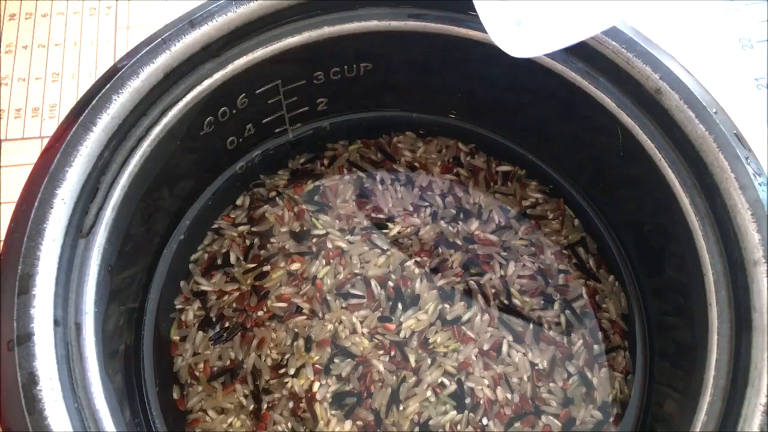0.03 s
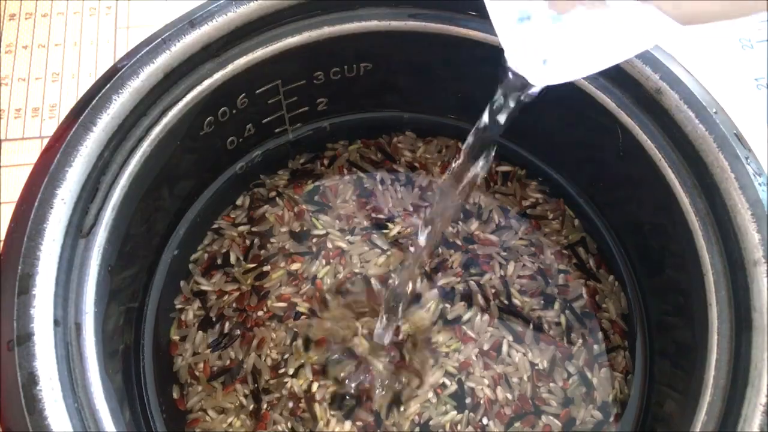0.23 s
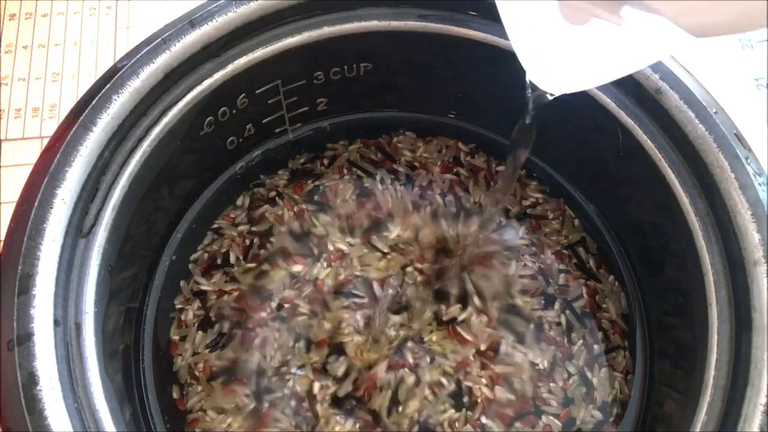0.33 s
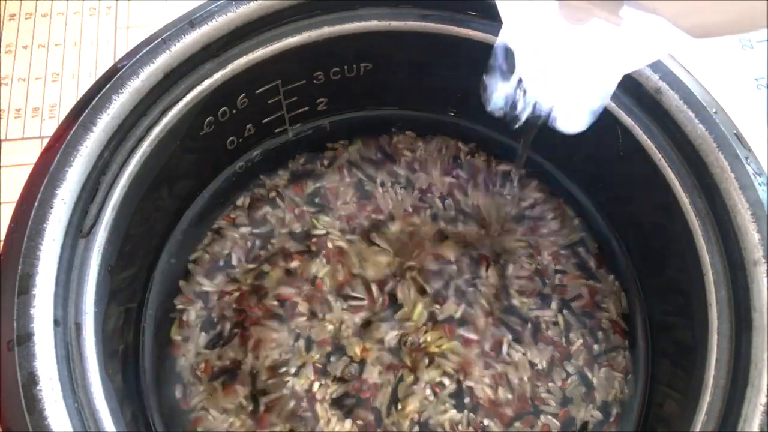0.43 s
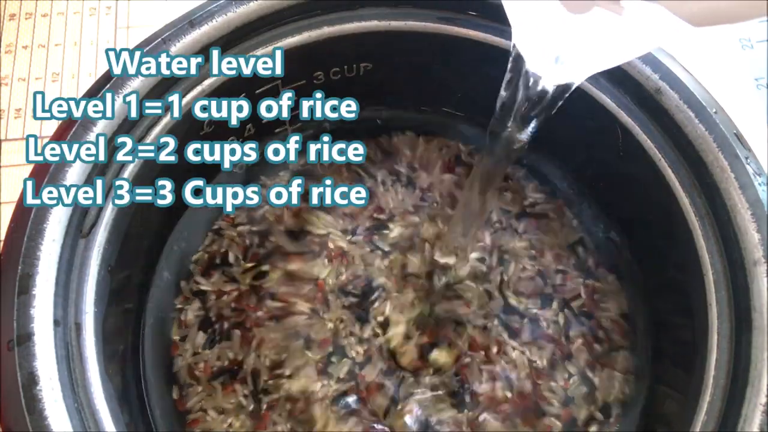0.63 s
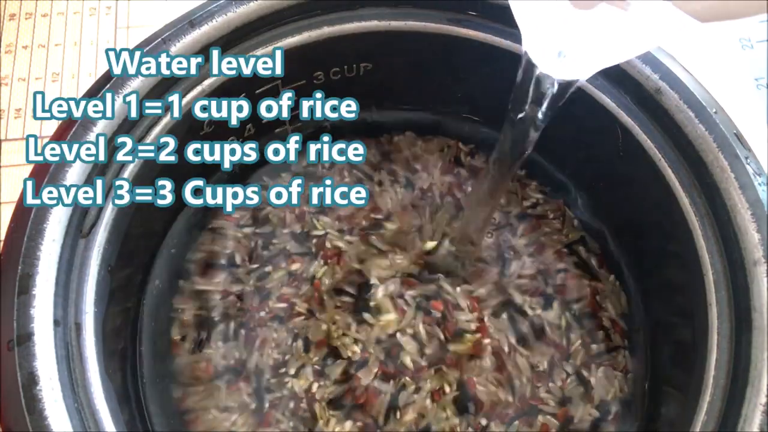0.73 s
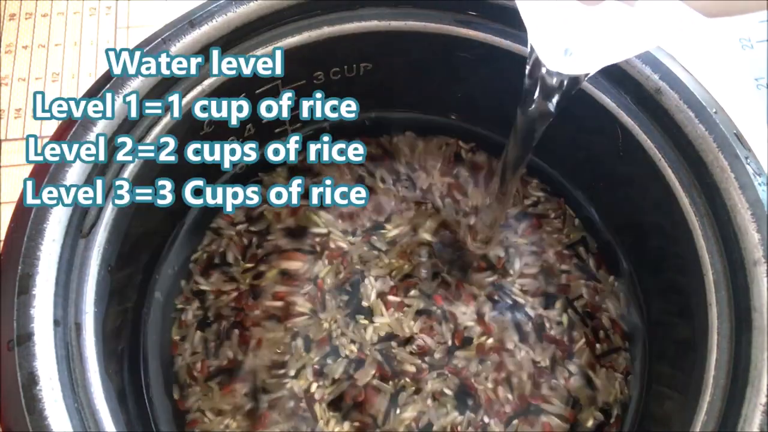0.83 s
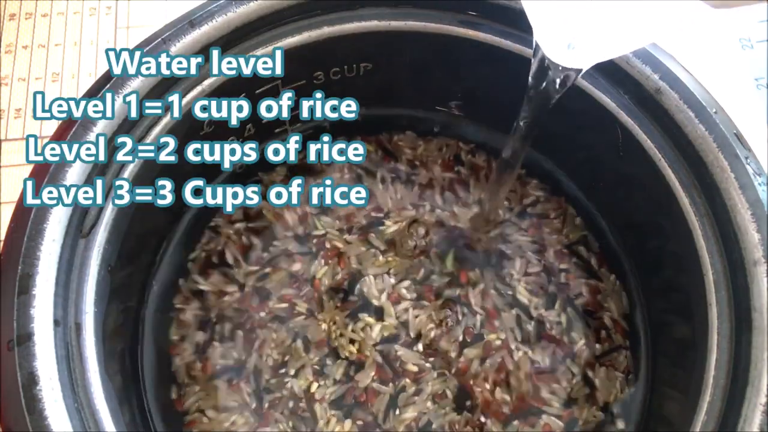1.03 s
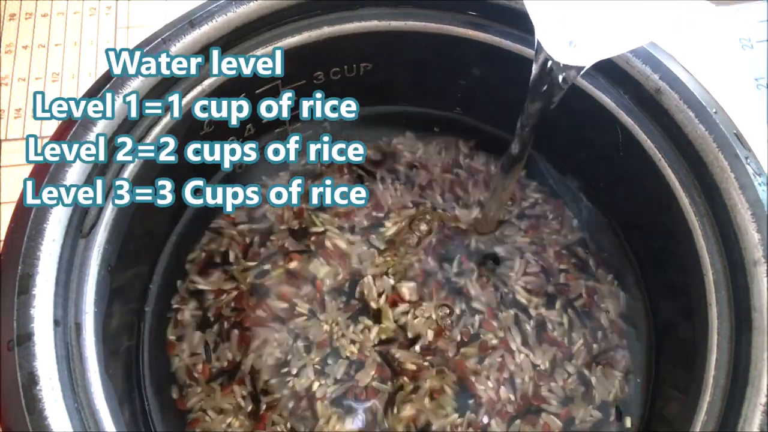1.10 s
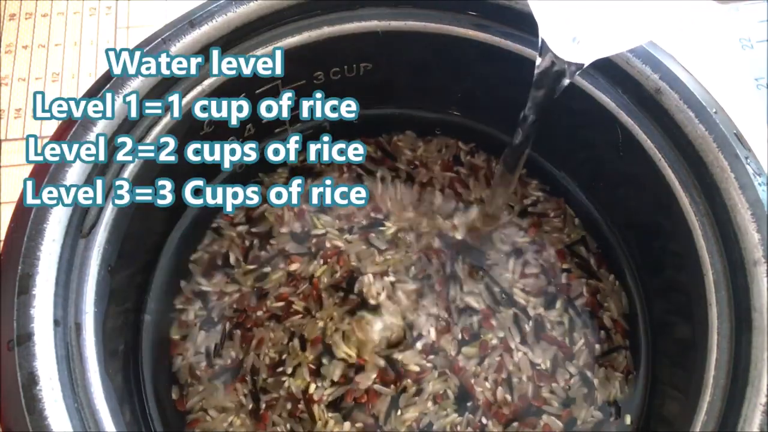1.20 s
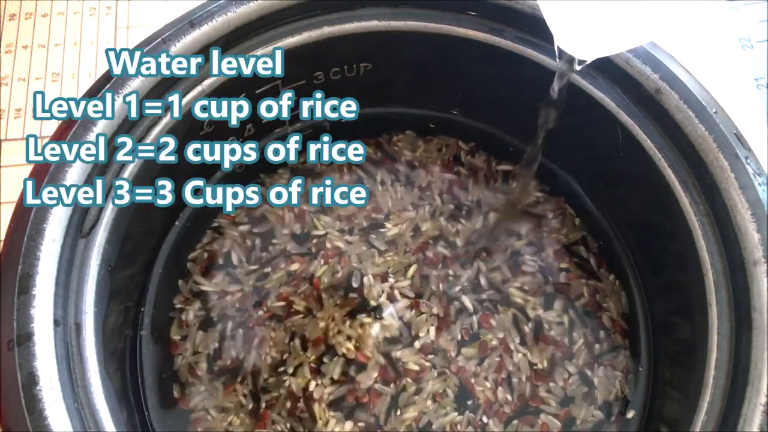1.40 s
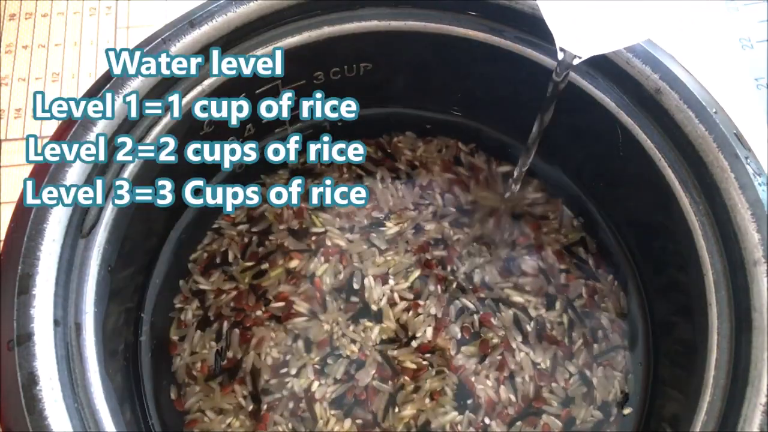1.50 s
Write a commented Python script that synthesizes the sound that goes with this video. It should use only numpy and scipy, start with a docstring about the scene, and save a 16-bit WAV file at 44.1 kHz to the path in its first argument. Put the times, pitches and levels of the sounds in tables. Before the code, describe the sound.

Close up in a quiet, humming kitchen, water splatters onto rice grains in a cooker pot. The plastic container knocks softly, then clacks once, and the stream soaks in with a fizzy crackle that dwindles to light drips.

```python
"""In a quiet kitchen with a low hum, water is poured from a plastic container onto rice in a metal
cooker pot. The container knocks softly, its modes ringing briefly; the first drops tick on the grains
and trap small air bubbles, which resonate. After one sharp clack the stream soaks in with a fine
crackle that thins out as the flow drops. The pot adds short echoes to the sound of the water."""
import sys
import numpy as np
from scipy import signal
from scipy.fft import rfft, irfft, next_fast_len
from scipy.io import wavfile

SR = 44100
rng = np.random.default_rng(int(sys.argv[2]) if len(sys.argv) > 2 else 0)


def materialize(psi):
    """Save the field psi as 16-bit PCM at rate SR to the path in sys.argv[1].

    A 1-D psi becomes a single channel; in a 2-D psi each row is a channel.
    """
    bounded = np.clip(np.atleast_2d(psi).T, -1, 1)
    quanta = np.round(bounded * 32767).astype(np.int16)
    wavfile.write(sys.argv[1], SR, quanta)


N = 68355

GUSH_S = (0.35, 0.49, 0.61)   # the full stream lands: start, peak, end


def from_db(db):
    """Amplitude ratio of a level: a factor of ten per 20 dB."""
    return 10 ** (np.asarray(db) / 20)


def rms_one(x):
    """Normalisation to unit mean power."""
    return x / np.sqrt(np.mean(x ** 2) + 1e-20)


def level_at(spectrum, hz):
    """Interpolation of a spectrum's level on a logarithmic frequency axis."""
    f, db = np.transpose(spectrum)
    return np.interp(np.log(hz + 1), np.log(f), db)


def noise(spectrum):
    """Spectral shaping of white noise, rms 1."""
    size = next_fast_len(N)
    gain = from_db(level_at(spectrum, np.fft.rfftfreq(size, 1 / SR)))
    return rms_one(irfft(rfft(rng.standard_normal(size)) * gain, size)[:N])


def decay(t, t60):
    """Exponential damping by 60 dB in t60."""
    return np.exp(-np.log(1000) * t / t60)


def onset(t, attack_s):
    """Exponential approach to full amplitude."""
    return 1 - np.exp(-t / attack_s)


def swell(times, peak_db):
    """Triangular amplitude envelope through start, peak and end times."""
    return from_db(peak_db) * np.interp(np.arange(N) / SR, times, [0, 1, 0])


def add(out, start_s, sound):
    """Superposition of a delayed sound."""
    i = max(int(start_s * SR), 0)
    out[i:i + len(sound)] += sound[:N - i]


def wavering(hz, depth=0.69, bandwidth_hz=10):
    """Slow random modulation of a tone's amplitude and phase, rms 1."""
    lowpass = signal.butter(2, bandwidth_hz, fs=SR, output="sos")
    slow = signal.sosfilt(lowpass, rng.standard_normal((2, 2 * N)))[:, N:]
    in_phase, quadrature = depth * rms_one(slow)
    phase = 2 * np.pi * hz * np.arange(N) / SR
    return rms_one((1 + in_phase) * np.sin(phase) + quadrature * np.cos(phase))


def bursts(flow, spectrum, pitches, peak_per_s, cycles, spread_db):
    """Shot noise: random impulses ring resonators, more rarely in weak flow; the rms follows the flow."""
    activity = np.maximum(flow / flow.max(), .02) ** 1.1
    sizes = from_db(spread_db * np.minimum(rng.exponential(1, N), 3)) * rng.choice([-1, 1], N)
    occurs = rng.random(N) < activity * peak_per_s / SR
    impulses = sizes * flow / np.sqrt(activity) * occurs
    pitch_index = rng.integers(0, len(pitches), N)
    out = np.zeros(N)
    for k, hz in enumerate(pitches):
        radius, angle = decay(1 / SR, cycles / hz), 2 * np.pi * hz / SR
        resonator = [1, 0, -1, 1, -2 * radius * np.cos(angle), radius * radius]
        ringing = signal.sosfilt([resonator] * 2, impulses * (pitch_index == k) + 1e-18)
        out += from_db(level_at(spectrum, hz)) * (1 - radius) * ringing
    return rms_one(out) * np.sqrt(np.mean(flow ** 2))


def impact(start_s, level_db, modes, tail_spectrum, tail_db, tail_t60, attack_s):
    """Modal vibration: a contact excites damped modes and leaves a diffuse tail in the pot."""
    out, t = np.zeros(N), np.arange(N) / SR
    ring = sum(from_db(db) * np.sin(2 * np.pi * hz * t) * decay(t, t60) for hz, db, t60 in modes)
    tail = from_db(tail_db) * noise(tail_spectrum) * decay(t, tail_t60)
    add(out, start_s, from_db(level_db) * (ring + tail) * onset(t, attack_s))
    return signal.sosfilt(signal.butter(2, 740, "high", fs=SR, output="sos"), out)


def kitchen():
    """Ambient noise: the line spectrum of a wavering hum over the continuous spectrum of the room."""
    # fainter tones of the hum: f/Hz, level/dB
    hum_lines = [(111, -78), (253, -74.5), (374, -70), (609, -77)]
    # room noise: f/Hz, relative spectral level/dB
    room_spectrum = [(20, -19), (40, 4), (60, 6), (90, -0.5), (115, 2.5), (170, -0.5), (260, -0.5),
                     (320, -4), (380, -5.5), (480, -8), (630, -10), (900, -16.5), (2000, -23.5),
                     (5000, -31.5), (15000, -35.5)]
    hum = from_db(-55.5) * wavering(hz=69.5) + sum(from_db(db) * wavering(hz) for hz, db in hum_lines)
    return hum + from_db(-58.5) * noise(room_spectrum)


def pot_reverberation(water):
    """Convolution with wall reflections, the pot's air modes and the diffuse tails of pot and kitchen."""
    # wall reflections: delay t/s, level/dB re direct sound
    echoes = [(.0013, -26), (.0021, -14), (.0051, -13), (0.009, -21.5)]
    # cavity modes: f/Hz, level/dB re direct sound, t60/s
    air_modes = [(905, 1, 0.048), (1590, -8.5, 0.096), (1750, -5, 0.085), (2095, -8, 0.077),
                 (2640, -6, 0.099)]
    t = np.arange(SR // 3) / SR
    response = np.zeros(len(t))
    response[0] = 1
    for delay, db in echoes:
        add(response, delay, from_db([db]))
    for hz, db, t60 in air_modes:
        envelope = decay(t, t60)
        response += 2 * from_db(db) * np.cos(2 * np.pi * hz * t) * envelope / envelope.sum()
    for db, t60 in (-12, 0.033), (-12.5, 0.12):   # pot, kitchen
        tail = rng.standard_normal(len(t)) * decay(t, t60)
        response += from_db(db) * tail / np.linalg.norm(tail)
    return signal.fftconvolve(water, response)[:N]


def trickle():
    """Flow noise of the first thin stream over the container's lip."""
    # trickle: f/Hz, relative spectral level/dB
    spectrum = [(500, 5.5), (900, 1), (2000, -2.5), (2800, -10), (3400, -4), (3800, 2.5), (4400, -24),
                (6500, -9.5), (9000, -23), (16000, -23)]
    return swell(times=(0.2, 0.311, 0.36), peak_db=-60) * noise(spectrum)


def gush():
    """Low-frequency impact noise as the full stream lands."""
    # rumble: f/Hz, relative spectral level/dB
    spectrum = [(50, -28), (90, -17), (130, 2), (200, -12), (350, -22), (700, -26.5), (2000, -38)]
    return swell(GUSH_S, peak_db=-56) * noise(spectrum)


def splatter():
    """Resonance of small bubbles thrown up where the full stream lands."""
    # bubble strength by pitch: f/Hz, relative level/dB
    spectrum = [(1300, -11.5), (2200, 8), (3400, 6), (5000, 0), (8000, 3)]
    flow = swell(GUSH_S, peak_db=-63)
    return bursts(flow, spectrum, np.geomspace(1300, 8000, 24), peak_per_s=500, cycles=39, spread_db=3.5)


def knock():
    """Free vibration of the container after a soft contact."""
    # modes of the knock: f/Hz, relative level/dB, t60/s
    modes = [(451, -10, 0.12), (630, -9.5, 0.075), (917, -15.5, 0.12), (1420, -0.5, 0.0092),
             (1886, 2.5, 0.023), (2010, -5, .025), (2370, -3, 0.022), (3217, -7.5, 0.023),
             (4160, -12, 0.027)]
    # diffuse tail: f/Hz, relative spectral level/dB
    tail = [(300, -6), (900, -5), (2000, 6.5), (4000, -11), (8000, -12.5), (16000, -36)]
    start_s, level_db = 0.2212, -32
    return impact(start_s, level_db, modes, tail, tail_db=-8, tail_t60=0.075, attack_s=0.00088)


def clack():
    """Impulsive excitation: a hard contact gives a pressure spike with a rebound and rings high modes."""
    # modes of the clack: f/Hz, relative level/dB, t60/s
    modes = [(814, -19, 0.1), (891, -9.5, 0.058), (1180, -18, 0.041), (1300, -17, 0.021),
             (1590, -16, 0.051), (2335, -2, 0.0082), (4720, -7.5, 0.0084), (5740, -0.5, 0.0045),
             (6700, 9, 0.0044), (8200, 0, 0.0046), (12600, 3, 0.0037)]
    # diffuse tail: f/Hz, relative spectral level/dB
    tail = [(250, -19), (520, -3), (800, 7.5), (2000, 2.5), (3200, -8), (6500, -3.5), (9000, -15),
            (16000, -22)]
    start_s, level_db, spike_period_s = 0.7252, -26, 0.00063
    out = impact(start_s, level_db, modes, tail, tail_db=-9, tail_t60=0.11, attack_s=0.00006)
    t = np.arange(SR // 200) / SR
    spike = from_db(-17.5) * np.cos(2 * np.pi * t / spike_period_s) * decay(t, t60=0.00089)
    add(out, start_s, spike)
    return out


def soaking():
    """Shot noise of water running between the grains and tiny bubbles escaping, over a smooth fizz."""
    # envelope of the flow: t/s, relative level/dB
    flow_levels = [(0, -110), (.26, -84), (.35, -64), (.45, -69), (.58, -65), (.68, -58), (0.739, -47.5),
                   (0.821, -48.5), (0.881, -55), (.96, -51.5), (1.048, -55), (1.18, -64), (1.36, -64),
                   (1.55, -65)]
    # crackle strength by pitch: f/Hz, relative level/dB
    crackle_spectrum = [(1500, -42), (3000, -14), (4500, -14), (7000, -8), (10000, 8.5), (13000, 8.5),
                        (16000, -10)]
    # escaping bubbles by pitch: f/Hz, relative level/dB
    seep_spectrum = [(1500, -3.5), (2800, -14), (4000, 1.5), (6500, -6), (9000, 4.5)]
    # fizz: f/Hz, relative spectral level/dB
    fizz_spectrum = [(400, -0.5), (1000, 2.5), (1800, 5), (2800, 5), (4000, 5.5), (7000, 3), (12000, 1.5),
                     (16000, -29)]
    flow = from_db(np.interp(np.arange(N) / SR, *np.transpose(flow_levels)))
    crackle_hz, seep_hz = np.linspace(1500, 15500, 28), np.geomspace(1600, 9000, 30)
    crackle = bursts(flow, crackle_spectrum, crackle_hz, peak_per_s=2400, cycles=5.3, spread_db=7)
    seep = bursts(flow, seep_spectrum, seep_hz, peak_per_s=990, cycles=21, spread_db=3.5)
    fizz = flow * noise(fizz_spectrum)
    return from_db(-2.5) * crackle + from_db(-11.5) * seep + from_db(-9.5) * fizz


def drops():
    """Impact transients: each drop gives a heavily damped tick and a brief spray in the same band."""
    # drops hitting the grains: t/s, f/Hz, relative level/dB
    hits = [(0.3735, 8400, -30), (0.4134, 7600, -33.5), (0.4464, 8300, -29), (.4502, 11600, -30),
            (.4525, 10500, -50), (.464, 9600, -35), (0.4783, 9700, -19), (.543, 9500, -31.5),
            (0.5451, 10400, -25.5), (0.6231, 12600, -23.5), (0.6687, 11500, -40), (.6857, 12700, -34.5),
            (0.7055, 12000, -25.5), (0.717, 9100, -20), (0.745, 10400, -47), (0.7639, 11000, -29),
            (.7735, 10300, -30.5), (0.788, 11200, -28.5), (0.7965, 10500, -34), (0.8234, 11600, -30),
            (.829, 11500, -30), (.845, 11500, -26), (0.9022, 7400, -29), (0.9093, 12000, -28),
            (.9429, 12400, -22.5), (0.9725, 11600, -28.5), (0.978, 11500, -30), (1.012, 11600, -33.5),
            (1.055, 10700, -45), (1.0966, 12900, -34.5), (1.1226, 9500, -40), (1.1545, 13000, -31.5),
            (1.176, 10500, -35), (1.211, 13500, -37), (1.2316, 12200, -46), (1.2655, 11400, -31.5),
            (1.316, 12600, -36), (1.334, 11600, -34), (1.3937, 10200, -42), (1.427, 9000, -45),
            (1.455, 12400, -54), (1.5004, 12700, -34)]
    gain_db, tick_cycles = 8, 7
    out, t = np.zeros(N), np.arange(SR // 50) / SR
    for start_s, hz, db in hits:
        band = signal.butter(1, [hz / 2, min(hz * 2.06, .45 * SR)], "band", fs=SR, output="sos")
        hiss = rms_one(signal.sosfilt(band, rng.standard_normal(len(t))))
        spray = from_db(-17.5) * hiss * decay(t, t60=0.0094)
        tick = np.cos(2 * np.pi * hz * t) * decay(t, tick_cycles / hz)
        add(out, start_s, from_db(db + gain_db) * (tick + spray) * onset(t, attack_s=0.0001))
    return signal.sosfilt(signal.butter(2, 1500, "high", fs=SR, output="sos"), out)


def bubbles():
    """Bubble resonance: trapped air pulsates as a damped oscillator whose pitch rises slightly."""
    # trapped bubbles: t/s, f/Hz, level/dB, cycles to decay by 60 dB
    trapped = [(0.362, 3900, -28, 23.7), (0.3738, 1500, -45, 116), (0.3825, 1790, -41, 38),
               (0.3828, 12600, -26.5, 35), (0.3952, 2160, -37, 11), (0.4124, 6480, -30, 60),
               (0.4129, 6100, -29.5, 29), (0.442, 13300, -27, 30), (0.4449, 12500, -18.5, 23),
               (0.4516, 8840, -27, 37), (0.448, 3360, -47.5, 45), (0.4603, 5300, -38.5, 35),
               (0.467, 8500, -39, 37), (0.4794, 10700, -31, 71), (.5038, 11350, -26, 52),
               (.5078, 2127, -34, 51), (.5142, 10250, -24.5, 29), (.525, 3140, -38, 52),
               (.5455, 2040, -41, 52), (0.5676, 1750, -46, 39), (0.582, 1560, -50, 44),
               (.6044, 14700, -30, 48), (.606, 1310, -58.5, 87), (0.6216, 2744, -37.5, 45),
               (0.6324, 13800, -22.5, 26), (0.6388, 4480, -40.5, 57), (.662, 6400, -36.5, 27),
               (.668, 12200, -31.5, 46), (.678, 2490, -54, 140), (0.6934, 6450, -24.5, 18.5),
               (.697, 4260, -29, 44), (0.7324, 6000, -26, 24), (0.7587, 7140, -33, 33),
               (.8843, 1692, -43.5, 66), (.903, 1670, -48, 94), (0.944, 2090, -45.5, 47),
               (0.9566, 4100, -41, 43), (0.9808, 1980, -46, 66), (0.9873, 1720, -46.5, 82),
               (0.988, 2660, -43, 94), (0.9898, 1590, -42, 64), (.993, 2150, -44.5, 105),
               (.999, 1677, -43.5, 110), (1.0962, 13700, -30, 18), (1.1241, 5680, -46, 72),
               (1.1451, 5870, -48, 39), (1.2658, 6600, -35, 68), (1.2665, 8700, -28, 23),
               (1.2929, 8200, -19.5, 13.7), (1.3168, 12000, -36, 16), (1.3218, 2330, -48.5, 17),
               (1.4825, 2550, -41.5, 26), (1.4986, 4070, -44, 35), (1.4992, 1820, -42.5, 27),
               (1.5008, 12900, -28, 29)]
    rise = 0.02   # share of the pitch gained over one ring
    out, t = np.zeros(N), np.arange(SR // 15) / SR
    for start_s, hz, db, cycles in trapped:
        t60 = cycles / hz
        pitch = hz * (1 + rise * np.minimum(t / t60, 1))
        phase = 2 * np.pi * np.cumsum(pitch) / SR
        add(out, start_s, from_db(db) * np.sin(phase) * decay(t, t60) * onset(t, attack_s=0.000079))
    return out


def scene():
    """Superposition of contacts, water and kitchen, heard from just above the pot."""
    contacts = knock() + clack()
    stream = trickle() + gush()
    water = pot_reverberation(bubbles() + drops() + splatter() + soaking())
    return (contacts + stream + water + kitchen())[None]


def record(dry):
    """Band limiting by a steep low-pass filter at 16 kHz."""
    return signal.sosfilt(signal.ellip(10, .1, 80, 16000, fs=SR, output="sos"), dry)


dry = scene()
out = record(dry)
materialize(out)
```